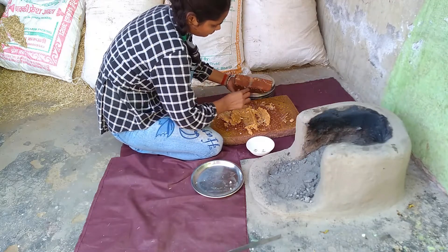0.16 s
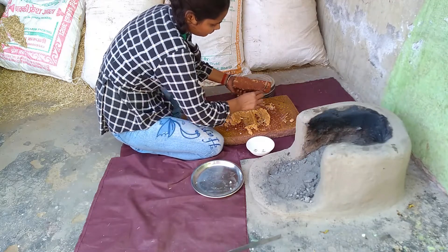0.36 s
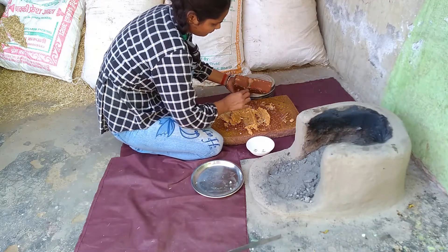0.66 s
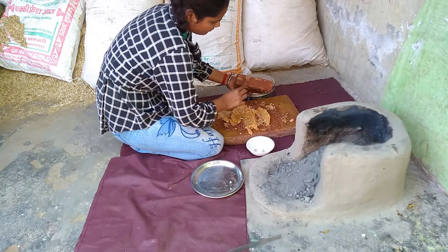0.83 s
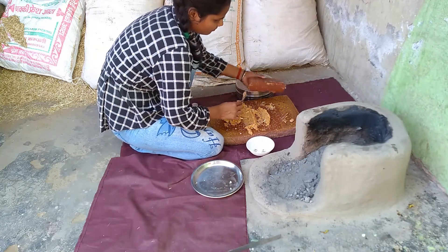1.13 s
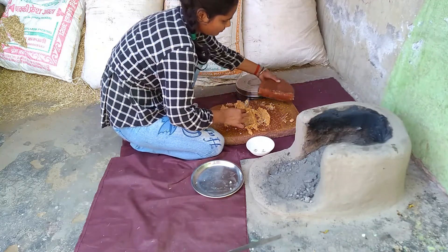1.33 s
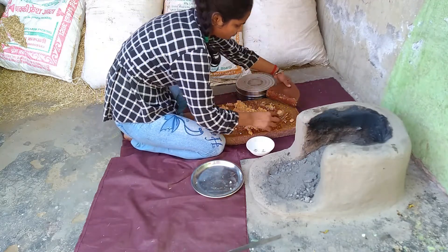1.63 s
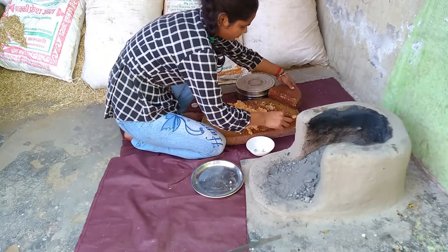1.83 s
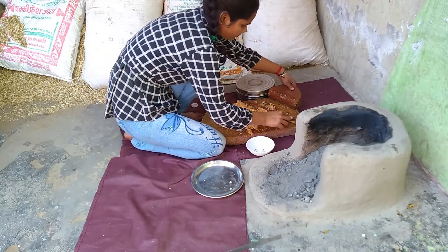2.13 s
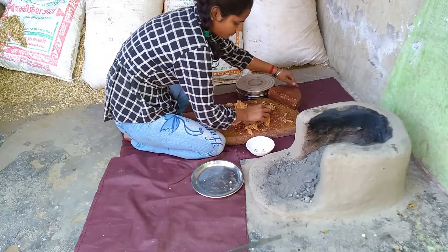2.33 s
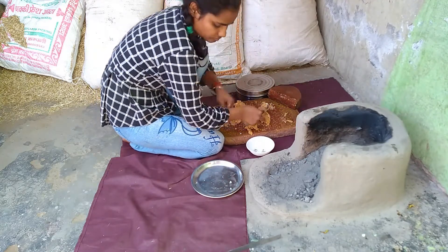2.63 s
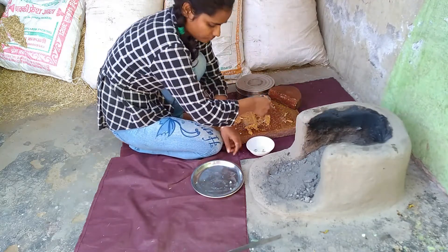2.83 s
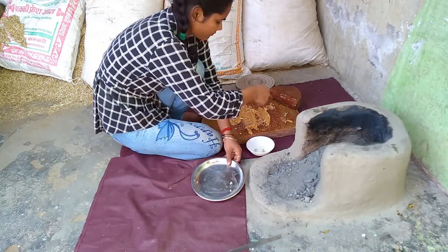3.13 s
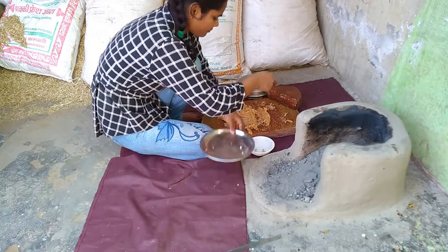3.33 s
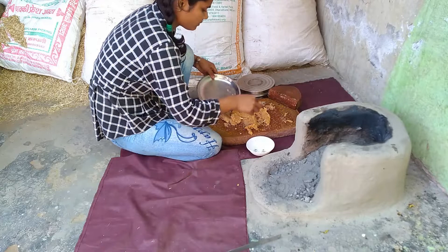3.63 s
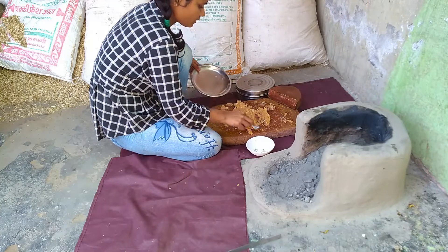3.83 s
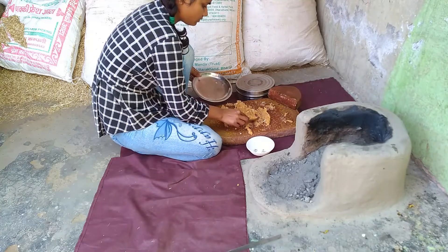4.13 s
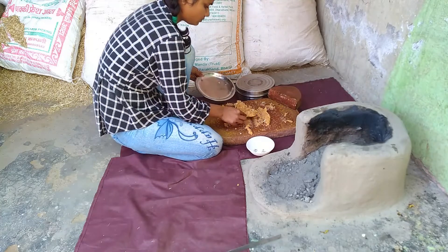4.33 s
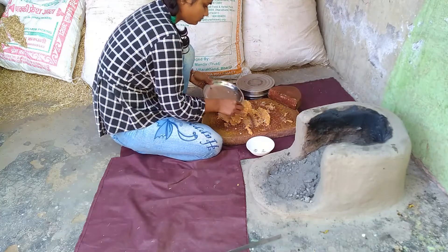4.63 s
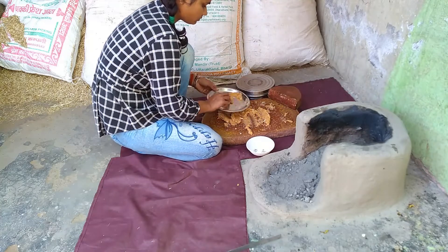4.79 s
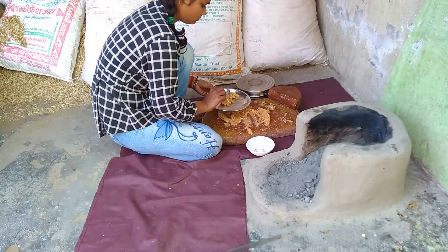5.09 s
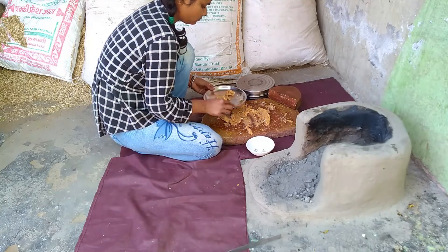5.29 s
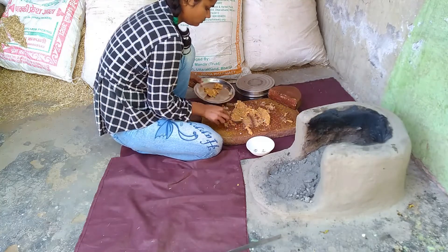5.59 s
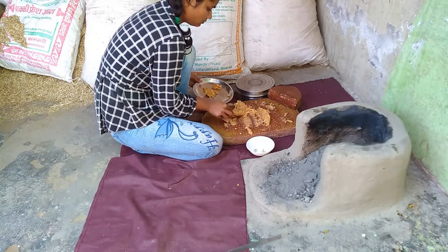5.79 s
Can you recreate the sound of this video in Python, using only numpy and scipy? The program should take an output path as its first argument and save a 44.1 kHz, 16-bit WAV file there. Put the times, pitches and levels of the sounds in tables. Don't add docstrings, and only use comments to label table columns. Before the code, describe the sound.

A close phone-like pickup in a small room with a short dull tail, faint steady hiss and soft low ground bumps. From 0 to 1.1 s, fingernails scrape a rough stone roller in bright gritty strokes, strongest near 0.1, 0.6 and 0.9 s, with sharp snaps and squeaks; the catch at 0.6 s is the loudest. Glass bangles clink lightly from 0.5 to 1.1 s. The roller knocks on the slab at 1.1 s, more firmly at 1.55 and 1.7 s, rocking slightly, then hardest and brightest at 2.3 s, among skin wipes and more clinks. A near-quiet stretch follows to 3.8 s. Nails squeal and scrape on a steel dish rim around 4.0 to 4.2 s, crumbs crack faintly, and smooth wet wipes swell near 4.4 s. The dish rings softly at 4.8 s. Faint cloth rustle and wipes continue, with another metallic scrape at 5.65 s and a light closing wipe.

```python
import sys
import numpy as np
from scipy import signal
from scipy.fft import rfft, irfft
from scipy.io import wavfile
from scipy.ndimage import uniform_filter1d

SR = 44100
rng = np.random.default_rng(int(sys.argv[2]) if len(sys.argv) > 2 else 0)


def materialize(psi):
    bounded = np.clip(np.atleast_2d(psi).T, -1, 1)
    quanta = np.round(bounded * 32767).astype(np.int16)
    wavfile.write(sys.argv[1], SR, quanta)


def rack_gain(trim_db):
    fader = np.asarray(trim_db, float)
    return 10 ** (fader / 20)


N = 262395
TIME = np.arange(N) / SR
FREQ = np.arange(N // 2 + 1) * SR / N + 1e-3

# (frequency [Hz], spectral level [dB])
STONE_SPECTRUM = [(240, -67.5), (400, -33.5), (1010, -27.5), (1250, -16.5), (1870, -12.5), (1990, -13.5),
                  (3010, -4), (4850, -4.5), (5320, -3.5), (6210, -11.5), (8720, -11), (10200, -15),
                  (11200, -15), (15200, -8.5), (15900, -23.5)]


def unit(x):
    return x / np.sqrt(np.mean(x ** 2))


def colour(x, points, peaks=()):
    hz, db = np.transpose(points)
    shape_db = np.interp(np.log(FREQ), np.log(hz), db)
    for centre_hz, width_hz, peak_db in peaks:
        shape_db = shape_db + peak_db / (1 + (2 * (FREQ - centre_hz) / width_hz) ** 2)
    return irfft(rfft(x) * rack_gain(shape_db), N)


def causal(x, points):
    hz, db = np.transpose(points)
    size = 2048
    grid_hz = np.arange(size // 2 + 1) * SR / size + 1
    cepstrum = irfft(np.log(rack_gain(np.interp(np.log(grid_hz), np.log(hz), db))))
    cepstrum[1:size // 2] *= 2
    cepstrum[size // 2 + 1:] = 0
    response = irfft(np.exp(rfft(cepstrum)))
    return signal.fftconvolve(x, response)[:len(x)]


def band(x, lo_hz, hi_hz, order=6):
    low_skirt = 1 + (lo_hz / FREQ) ** (2 * order)
    high_skirt = 1 + (FREQ / hi_hz) ** (2 * order)
    return unit(irfft(rfft(x) / np.sqrt(low_skirt * high_skirt), N))


def walk(rate):
    hold = int(SR / rate)
    levels = np.repeat(rng.standard_normal(N // hold + 1), hold)
    return unit(uniform_filter1d(levels, hold)[:N])


def add(track, s, sound):
    i = int(s * SR)
    track[i:i + len(sound)] += sound[:N - i]


def fade(t60, rise_s):
    t = np.arange(int(1.3 * t60 * SR) + 64) / SR
    return t, (1 - np.exp(-t / rise_s)) * rack_gain(-60 * t / t60)


def ring(modes, stretch, rise_s):
    out = np.zeros(SR)
    for hz, db, t60 in modes:
        t, env = fade(min(t60 * stretch, .76), rise_s)
        out[:len(t)] += rack_gain(db) * env * np.sin(2 * np.pi * (hz * t + rng.random()))
    return out


def burst(hz, t60, width, rise_s):
    t, env = fade(t60, rise_s)
    edges = [hz / (1 + width), hz * (1 + width)]
    sos = signal.butter(3, edges, "band", fs=SR, output="sos")
    y = signal.sosfilt(sos, env * rng.standard_normal(len(t)))
    return y / np.abs(y).max()


def patchy(x, patch_db, size):
    z = signal.stft(x, nperseg=256)[2]
    field = uniform_filter1d(rng.standard_normal(z.shape), size[0], axis=0)
    field = uniform_filter1d(field, size[1], axis=1)
    return signal.istft(z * rack_gain(patch_db * unit(field)), nperseg=256)[1][:N]


def grit(rate, scatter_db, slip_ms, hiss, patch_db):
    sizes_db = scatter_db * np.minimum(rng.exponential(size=N), 2.5)
    slips = (rng.random(N) < rate / SR) * rack_gain(sizes_db)
    puffs = signal.lfilter([1], [1, -np.exp(-1000 / (slip_ms * SR))], slips)
    return patchy((unit(puffs) + hiss) * rng.standard_normal(N), patch_db, size=(4, 3))


def swells(rows):
    slack_db = 20
    press_roundness, release_roundness = 1.9, 1.486
    t = TIME[::32]
    power, bright = np.full(len(t), 1e-15), np.zeros(len(t))
    for s, press_s, release_s, db, bright_db in rows:
        away = np.abs(t - s) / np.where(t < s, press_s, release_s)
        roundness = np.where(t < s, press_roundness, release_roundness)
        touch = rack_gain(2 * (db - slack_db * away ** roundness))
        power = power + touch
        bright = bright + touch * bright_db
    return np.interp(TIME, t, 10 * np.log10(power)), np.interp(TIME, t, bright / power)


def stroke(rows, x, edges_hz, layers, flicker_db):
    body_db, bright_db = swells(rows)
    low_db, sheen_db, air_db = (db + slope * bright_db for db, slope in layers)
    foot, low, mid, high = edges_hz
    out = band(x, low, mid) + rack_gain(low_db) * band(x, foot, low)
    out += rack_gain(sheen_db) * band(x, mid, high)
    out += rack_gain(air_db) * band(x, high, SR / 2)
    return out * rack_gain(body_db + flicker_db * walk(40))


def quiet_floor():
    # (frequency [Hz], spectral level [dB])
    spectrum = [(12, -35.5), (20, 2.5), (49, -1.5), (65, -14.5), (110, -6.5), (177, -13.5), (445, -19.5),
                (588, -22.5), (676, -21.5), (735, -23.5), (1320, -26.5), (1900, -28), (3820, -30),
                (9890, -33), (15900, -40.5)]
    hiss = band(colour(rng.standard_normal(N), spectrum), 130, 12500, order=5)
    return rack_gain(-74.5 + 1.2 * walk(9)) * hiss


def roller_scrape():
    # (firmest time [s], press [s], release [s], level [dB], brightness [dB])
    strokes = [(.046, 0.063, 0.13, -38, 0), (.122, 0.083, 0.079, -30.5, 0), (.231, .07, 0.11, -62.5, 9.5),
               (.4145, 0.0021, 0.054, -45.5, 5), (.468, 0.012, 0.17, -35.5, -5.5),
               (.579, 0.064, 0.098, -26, 0), (.72, .08, 0.11, -60.5, 11), (.843, 0.0046, 0.061, -51, 3),
               (.918, .04, 0.07, -29, -3.5), (.96, .05, 0.11, -30.5, -2), (1.09, .07, 0.11, -65.5, 10.5)]
    # (frequency [Hz], width [Hz], gain [dB])
    peaks = [(5400, 450, 5), (8000, 380, 3), (8600, 1300, 8.5), (11330, 710, 7.5), (14900, 1000, 3)]
    # (foot [Hz], low [Hz], mid [Hz], high [Hz])
    edges = (300, 2000, 6500, 10000)
    # (level [dB], slope [dB per dB of brightness])
    layers = [(-17.5, -0.22), (-8, 1.78), (-14.5, 0)]
    roller = grit(rate=900, scatter_db=2.5, slip_ms=1.2, hiss=1.1, patch_db=3.0)
    roller = colour(roller, STONE_SPECTRUM, peaks)
    return stroke(strokes, roller, edges, layers, flicker_db=-1.0)


def low_bumps():
    # (time [s], level [dB], dying time [s])
    bumps = [(0.049, -48.5, 0.05), (.14, -57, .04), (.25, -59, 0.029), (0.35, -56, 0.064),
             (.43, -55, 0.058), (0.499, -61, 0.046), (.686, -52, .05), (.755, -59, .03), (.83, -59.5, 0.06),
             (.89, -49.5, 0.058), (1.088, -42.5, 0.1), (1.2, -50, 0.097), (1.3, -56, 0.059),
             (1.561, -59.5, 0.095), (1.759, -64.5, 0.11), (2.219, -55, 0.079), (2.3, -63, 0.081),
             (2.48, -59, 0.038), (3.86, -48, .08), (4.04, -57.5, 0.057), (4.31, -64.5, 0.084),
             (4.485, -56, 0.04), (4.87, -62.5, 0.11), (5.299, -67, 0.096), (5.68, -61.5, .12),
             (5.9, -66.5, 0.11)]
    # (frequency [Hz], spectral level [dB])
    spectrum = [(12, -32.5), (25, -4), (50, -3), (102, -8.5), (125, -10.5), (140, -26), (200, -27),
                (300, -33), (450, -59.5)]
    rise_share, rumble_db = 0.14, -70.5
    rows = [(s, rise_share * die_s, die_s, db, 0) for s, db, die_s in bumps]
    level = np.hypot(rack_gain(swells(rows)[0]), rack_gain(rumble_db))
    thud = band(colour(rng.standard_normal(N), spectrum), 24, 400, order=3)
    return level * rack_gain(3.0 * walk(25)) * thud


def squeaks():
    # (time [s], length [s], start frequency [Hz], end frequency
    # [Hz], level [dB])
    glides = [(2.895, .04, 5000, 6600, -67), (4.015, .075, 5500, 5750, -43),
              (4.075, .075, 6300, 6700, -40.5), (4.15, 0.033, 6200, 6900, -40),
              (4.185, 0.047, 6600, 6600, -53), (.12, 0.093, 3200, 2950, -43.5), (2.3, .12, 5700, 5700, -63),
              (1.05, .2, 10200, 10000, -66), (.87, .15, 5600, 5500, -36), (.55, .1, 8600, 8500, -36),
              (4.02, 0.056, 2000, 2900, -60), (4.055, .2, 2850, 3200, -56), (2.155, .1, 6600, 6100, -52.5),
              (2.155, .14, 8700, 8300, -46.5), (.49, .15, 5150, 5600, -27.5),
              (.05, 0.119, 5300, 5500, -30.5), (5.64, 0.099, 5000, 6250, -43.5),
              (3.76, .18, 3400, 3200, -79.5)]
    out = np.zeros(N)
    for s, length, from_hz, to_hz, db in glides:
        t = np.arange(int(length * SR)) / SR
        tone = signal.chirp(t, from_hz, length, to_hz)
        add(out, s, rack_gain(db) * np.hanning(len(t)) * walk(620)[:len(t)] * tone)
    return out


def nail_snaps():
    # (time [s], peak level [dB])
    grains = [(.0534, -22), (0.064, -21.5), (0.0767, -17.5), (.1127, -17), (.1238, -14), (.131, -17),
              (.1409, -18), (0.1595, -21), (.17, -25), (0.4161, -23), (0.49, -24), (.5103, -22),
              (0.5665, -11), (.578, -12), (.5889, -9), (0.6155, -13)]
    snap = -causal(signal.unit_impulse(512), STONE_SPECTRUM)
    out = np.zeros(N)
    for s, db in grains:
        add(out, s, rack_gain(db - 3.5) * snap / np.abs(snap).max())
    return out


def nail_catches():
    # (time [s], peak level [dB], centre frequency [Hz], T60 [s])
    catches = [(0.414, -16, 5570, 0.019), (0.462, -22, 4200, 0.06), (0.577, -11, 5400, 0.04),
               (0.5867, -6, 5400, 0.03), (0.6143, -10.5, 4550, 0.081), (0.839, -50, 8900, 0.036),
               (2.167, -40.5, 8600, 0.045), (3.9577, -31, 8870, 0.036), (4.0924, -30, 6440, 0.036),
               (4.1636, -25, 6310, 0.027), (5.679, -24, 6120, 0.032), (5.728, -21.5, 6550, 0.035)]
    out = np.zeros(N)
    for s, db, hz, t60 in catches:
        add(out, s, rack_gain(db - 10) * burst(hz, t60, width=.6, rise_s=0.0014))
    return out


def bangle_clinks():
    # (time [s], peak level [dB], frequency [Hz])
    clinks = [(0.5294, -33, 7400), (0.6644, -33.5, 8340), (0.6923, -38.5, 8360), (.72, -43, 8350),
              (0.7394, -45, 7520), (.752, -45, 8350), (.772, -46, 7540), (0.7894, -47, 8350),
              (.805, -47, 7540), (0.824, -43, 8340), (.841, -41, 8350), (.841, -43, 7530),
              (0.8594, -40, 7530), (0.9048, -32, 7620), (0.9694, -33, 7600), (1.0, -36, 7580),
              (1.0294, -35.5, 7640), (1.0899, -42, 7530), (1.0899, -45, 8330), (1.1294, -52, 7540),
              (2.1814, -37, 8830), (2.2218, -32.5, 8320), (2.3796, -41, 7440), (2.4176, -51, 8390),
              (2.5225, -57, 8230), (2.5994, -71, 8500)]
    # (time [s], peak level [dB], frequency [Hz])
    high_clinks = [(0.6948, -52, 9650), (0.7394, -53, 9680), (2.3806, -60, 9730), (2.6045, -55, 9740),
                   (1.59, -66, 14000)]
    out = np.zeros(N)
    for rows, t60 in (clinks, .14), (high_clinks, .15):
        for s, db, hz in rows:
            add(out, s, rack_gain(db - 5) * burst(hz, t60, width=.012, rise_s=.002))
    return out


def roller_knocks():
    # (time [s], peak level [dB], tail T60 [s], crack over tail [dB], slab level [dB])
    blows = [
        (1.087, -30, 0.23, 6, -35),
        (1.557, -24, 0.33, 18.5, -32),
        (1.7176, -20, 0.31, 19.5, -35.5),
        (2.294, -11.5, 0.12, 9.5, -28),
    ]
    # (frequency [Hz], spectral level [dB])
    spectra = [
        [(71, -28), (120, -1.5), (578, -3), (808, -11.5), (1210, -9.5), (1370, -13.5), (1540, -7), (1900, -21),
         (2470, -55), (4180, -120)],
        [(71, -40.5), (120, -14), (173, -4.5), (322, -9.5), (410, -1.5), (507, -13.5), (555, -2.5), (836, -5.5),
         (2080, -19.5), (4500, -67), (5850, -93.5), (9900, -120)],
        [(71, -41.5), (120, -32), (173, -11), (326, -5), (422, -2.5), (686, -9.5), (902, -7.5), (1120, -2.5),
         (1600, -14.5), (2170, -5.5), (4500, -57.5), (5850, -84), (9900, -120)],
        [(71, -52), (120, -29.5), (183, -11), (327, -12), (436, -10), (571, -12), (1330, -1.5), (1680, -13),
         (2000, -2.5), (2470, -12.5), (2670, -4.5), (3000, -13), (12000, -40), (15600, -68), (22000, -120)],
    ]
    slams_db = [14, 21, 18, 18]
    # (frequency [Hz], level [dB], T60 [s])
    blow_modes = [
        [(191, -4, 0.17), (352, 1, .1), (580, -2, .1), (1200, -9, 0.072), (1500, -8, .08)],
        [(194, -15, .15), (438, 0.5, .08), (580, -4.5, 0.088), (823, -4, 0.089), (1078, 1, .07),
         (1705, -13, .07), (2034, -8.5, .06)],
        [(270, -12.5, .12), (430, 0.5, .08), (913, -9, 0.099), (1141, -1.5, .08), (1518, -10.5, .08),
         (1701, -11, .06), (2110, -1, 0.055), (2390, -10.5, .06)],
        [(194.2, -12.5, .14), (425.7, -10, .09), (828, -8, .1), (1081, 0, .07), (1373, -7, 0.087),
         (1863, -6, .08), (1971, 0.5, .07), (2314, -8, .08), (2697, -9, .07), (3300, -20, .07),
         (4000, -24, .05), (4750, -24, .05), (5800, -24, .05)],
    ]
    blow_modes_db = [-39.5, -31, -26.5, -19]
    # (frequency [Hz], level [dB], T60 [s])
    slab = [(2010, -22.5, 0.94)]
    slam_lag_s = .0024
    lowpass = signal.butter(4, 2800., fs=SR, output="sos")
    out = np.zeros(N)
    for blow, spectrum, slam_db, modes, ring_db in zip(blows, spectra, slams_db, blow_modes, blow_modes_db):
        s, db, tail_t60, crack_db, slab_db = blow
        noise, push = rng.standard_normal(SR), np.zeros(SR)
        dull = unit(signal.sosfilt(lowpass, noise))
        t, env = fade(tail_t60, rise_s=.002)
        push[:len(t)] += env * dull[:len(t)]
        t, env = fade(0.03, rise_s=0.0012)
        push[:len(t)] += rack_gain(crack_db + 10.0) * env * noise[:len(t)]
        push[int(slam_lag_s * SR)] += rack_gain(crack_db + slam_db)
        y = causal(push, spectrum)
        add(out, s, rack_gain(db) * y / np.abs(y).max())
        add(out, s, rack_gain(ring_db) * ring(modes, 0.98, rise_s=.0012))
        for hz, mode_db, t60 in slab:
            add(out, s, rack_gain(db + slab_db + mode_db) * burst(hz, t60, width=0.055, rise_s=.02))
    return out


def skin_wipe():
    # (firmest time [s], press [s], release [s], level [dB], brightness [dB])
    wipes = [(1.3, .1, 0.13, -77.5, -4), (1.59, 0.096, 0.092, -80, 13), (2.0, 0.46, 0.2, -76.5, -14.5),
             (2.172, 0.011, .08, -49.5, 4.5), (2.235, 0.044, 0.053, -47, 2.5),
             (2.352, 0.052, 0.038, -56, 1), (2.4, 0.033, 0.17, -71, 14.5), (2.57, 0.054, .14, -66.5, 9),
             (2.63, .02, 0.19, -64.5, -25), (2.712, 0.14, 0.085, -55, 0.5),
             (2.916, 0.043, 0.055, -79, -11.5), (3.03, 0.053, .2, -80.5, 13),
             (3.25, 0.082, .12, -69.5, 22.5), (3.27, 0.09, 0.079, -73.5, 8), (3.5, 0.084, 0.11, -82, 7.5),
             (4.28, .08, 0.33, -65.5, -11), (4.44, 0.3, 0.16, -52.5, -0.5), (4.68, 0.038, 0.081, -59.5, 7),
             (5.17, 0.077, 0.26, -52.5, -0.5), (5.35, 0.17, 0.14, -52, 2.5), (5.8, 0.048, 0.052, -60, 1.5),
             (3.86, 0.089, 0.14, -83.5, -11.5), (5.94, 0.15, .15, -55.5, 6)]
    # (frequency [Hz], spectral level [dB])
    spectrum = [(1290, -51.5), (2200, -12), (2430, -19), (3250, -16.5), (3930, -18), (4790, -19.5),
                (5250, -14), (7870, -3.5), (14800, -16.5), (15900, -32.5)]
    # (level [dB], slope [dB per dB of brightness])
    layers = [(-17, -.6), (-10.5, 1.0)]
    sheen_db, bright_db = swells(wipes)
    body_db, air_db = (db + slope * bright_db for db, slope in layers)
    x = colour(grit(rate=5300, scatter_db=-1.5, slip_ms=1.0, hiss=1.5, patch_db=1.5), spectrum)
    out = band(x, 5000, 9500, order=14)
    out += rack_gain(body_db) * band(x, 2900, 5000, order=10)
    out += rack_gain(air_db) * band(x, 9500, SR / 2, order=14)
    return out * rack_gain(sheen_db + 1.0 * walk(25))


def damped_contacts():
    # (time [s], peak level
    # [dB], centre frequency [Hz], T60 [s])
    contacts = [(1.462, -66, 940, 0.14), (1.618, -45, 436, 0.027), (1.754, -37, 1050, 0.06),
                (1.752, -38, 500, 0.044), (1.805, -47, 1360, 0.043), (1.6305, -59, 2200, 0.31),
                (1.678, -60, 2300, .1), (2.2, -66, 1080, .15), (2.13, -73, 1250, .08),
                (2.62, -70, 1450, .12), (2.5, -68, 1510, .2), (2.62, -55, 3600, 0.16),
                (1.799, -53, 460, 0.04), (1.86, -54.5, 616, 0.33), (1.953, -54.5, 558, 0.056),
                (1.765, -54, 3140, 0.3), (3.826, -57, 427, 0.11), (3.835, -56, 195, 0.066),
                (3.859, -48, 182, 0.1), (3.962, -54, 1240, 0.021), (4.018, -57.5, 1230, 0.24),
                (4.093, -60, 1130, 0.051), (4.248, -61, 1160, 0.07), (4.72, -61.5, 880, 0.17),
                (4.78, -63, 775, .12), (4.83, -59, 580, 0.054), (4.868, -52.5, 525, 0.025),
                (4.87, -57, 340, .03), (4.865, -64, 900, 0.059), (2.36, -50, 2000, .3),
                (4.89, -64, 440, .12), (5.0, -65.5, 400, .05), (4.7, -63, 616, 0.13)]
    out = np.zeros(N)
    for s, db, hz, t60 in contacts:
        add(out, s, rack_gain(db - 2.0) * burst(hz, t60, width=0.15, rise_s=0.0031))
    return out


def cloth_rustle():
    # (firmest time [s], press [s], release [s], level [dB], brightness [dB])
    folds = [(2.65, 0.18, 0.31, -85.5, 9.5), (2.85, 0.084, 0.092, -85, -13), (3.835, 0.019, .1, -80.5, -23),
             (4.45, 0.073, 0.27, -81, -2), (4.68, 0.26, 0.15, -77, -8), (4.872, 0.039, 0.072, -71, -5.5),
             (5.08, 0.48, 0.19, -77, -5), (5.3, 0.214, 0.13, -82, 9), (5.68, .08, 0.16, -79.5, 6.5)]
    noise = patchy(rng.standard_normal(N), patch_db=5.0, size=(1, 20))
    cloth_db, crisp_db = swells(folds)
    rub = band(noise, 250, 1100, order=3) + rack_gain(crisp_db) * band(noise, 1300, 2800, order=4)
    return rack_gain(cloth_db + 2.5 * walk(30)) * rub


def rim_scrape():
    # (firmest time [s], press [s], release [s], level [dB], brightness [dB])
    strokes = [(3.9585, 0.002, 0.032, -47.5, 4), (4.017, .004, 0.058, -51, 4.5),
               (4.06, 0.053, .13, -44, 2.5), (4.166, 0.0248, 0.011, -42, -4),
               (4.21, 0.046, 0.078, -55.5, 1.5), (5.632, 0.015, 0.036, -42.5, 0.5),
               (5.66, 0.032, 0.11, -38, 2.5), (5.72, 0.063, 0.058, -39.5, -5.5)]
    # (frequency [Hz], spectral level [dB])
    spectrum = [(880, -64), (1500, -22), (2250, -15), (2770, -1.5), (3760, -14), (4580, -8), (6280, -0.5),
                (6800, -4), (8620, -1.5), (9610, 0), (11500, -7), (12500, -6), (15900, -14)]
    # (frequency [Hz], width [Hz], gain [dB])
    peaks = [(3020, 640, 1.5), (4630, 220, 2.5), (6224, 47, 10), (7770, 420, 2.5), (9200, 710, 4),
             (10520, 330, 6.5), (12230, 100, 8)]
    # (foot [Hz], low [Hz], mid [Hz], high [Hz])
    edges = (2200, 4500, 7500, 11000)
    # (level [dB], slope [dB per dB of brightness])
    layers = [(-14, 0.079), (-7, 0.98), (-5, 0.59)]
    rim = grit(rate=600, scatter_db=3.0, slip_ms=1.5, hiss=.9, patch_db=3.0)
    rim = colour(rim, spectrum, peaks)
    return stroke(strokes, rim, edges, layers, flicker_db=0.5)


def crumb_cracks():
    # (time [s], peak level [dB], centre frequency [Hz])
    cracks = [(4.196, -35, 3660), (4.203, -41, 4200), (4.212, -37.5, 3700), (4.2288, -35, 3700),
              (4.2844, -43, 4000), (4.3693, -44.5, 4400), (4.376, -44.5, 3600)]
    out = np.zeros(N)
    for s, db, hz in cracks:
        add(out, s, rack_gain(db - 2.5) * burst(hz, t60=.014, width=0.14, rise_s=0.00091))
    return out


def dish_ring():
    # (frequency [Hz], level [dB], T60 [s])
    modes = [(1406, -14.5, 0.83), (1460, -1.5, 1.0), (1580, -4.5, 0.97), (1690, -17, 0.89)]
    # (frequency [Hz], peak level [dB], T60 [s], relative width [1])
    puffs = [(1503, -54, 1, 0.07), (1914, -63, 1, 0.043), (3290, -46.5, 0.42, 0.18),
             (4540, -60.5, 0.33, 0.093), (5570, -61, 0.48, 0.088), (8160, -58.5, 0.44, 0.075),
             (10140, -57, 0.47, 0.12)]
    strike_s = 4.8262
    out = np.zeros(N)
    add(out, strike_s, rack_gain(-51.5) * ring(modes, 1.0, rise_s=0.0071))
    for hz, db, t60, width in puffs:
        add(out, strike_s, rack_gain(db) * burst(hz, t60, width, rise_s=.008))
    return out


def room_tail(near):
    t, env = fade(0.14, rise_s=0.0034)
    tail = env * rng.standard_normal(len(t))
    tail = signal.sosfilt(signal.butter(2, 5000., fs=SR, output="sos"), tail)
    return rack_gain(-10) * signal.fftconvolve(near, tail / np.sqrt(np.sum(tail ** 2)))[:N]


def scene():
    near = roller_scrape() + squeaks() + nail_snaps() + nail_catches() + bangle_clinks()
    near += roller_knocks() + skin_wipe() + damped_contacts()
    near += rim_scrape() + crumb_cracks() + dish_ring()
    far = quiet_floor() + low_bumps() + cloth_rustle()
    return (near + room_tail(near) + far)[None]


def band_limit(x):
    return signal.sosfilt(signal.butter(12, 15830, fs=SR, output="sos"), x)


def record(dry):
    lowpass = signal.ellip(8, .2, 70, 15750, fs=SR, output="sos")
    mix = signal.sosfilt(lowpass, dry)
    return band_limit(mix)


dry = scene()
out = record(dry)
materialize(out)
```